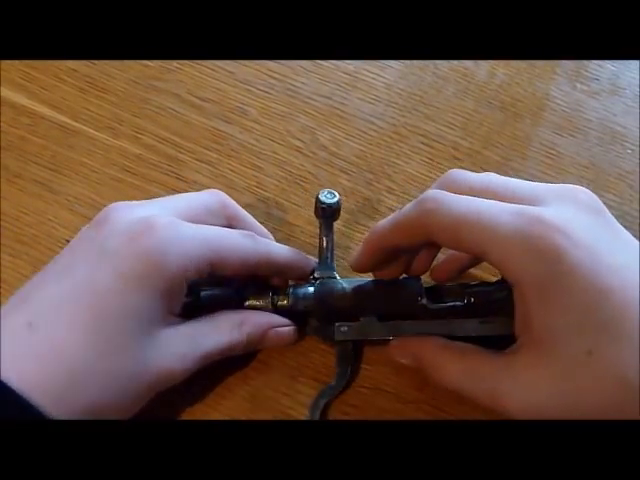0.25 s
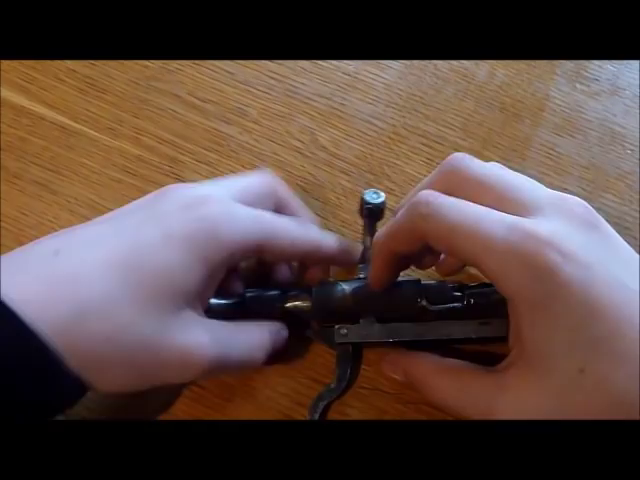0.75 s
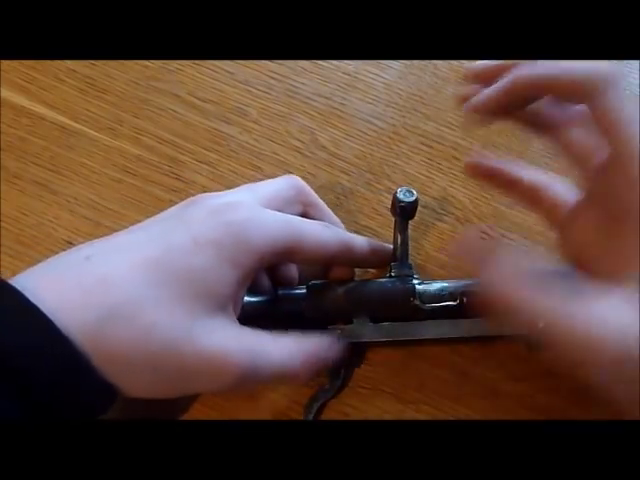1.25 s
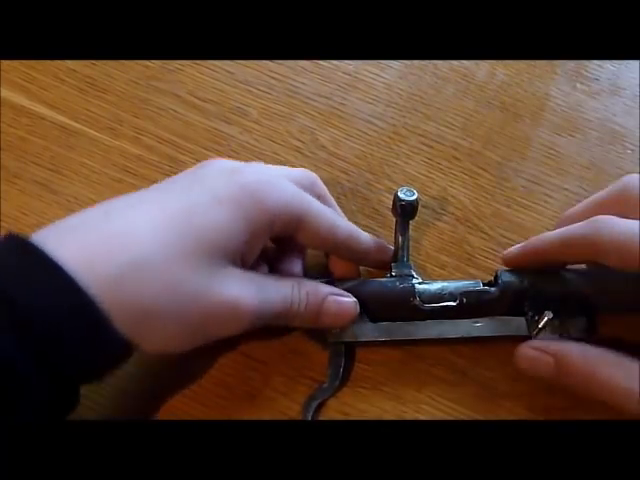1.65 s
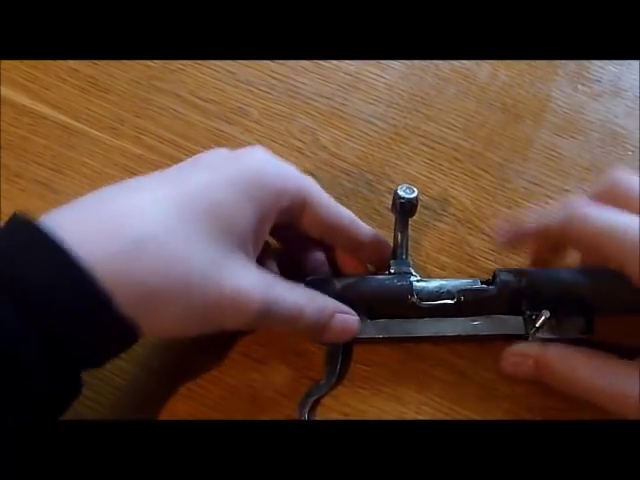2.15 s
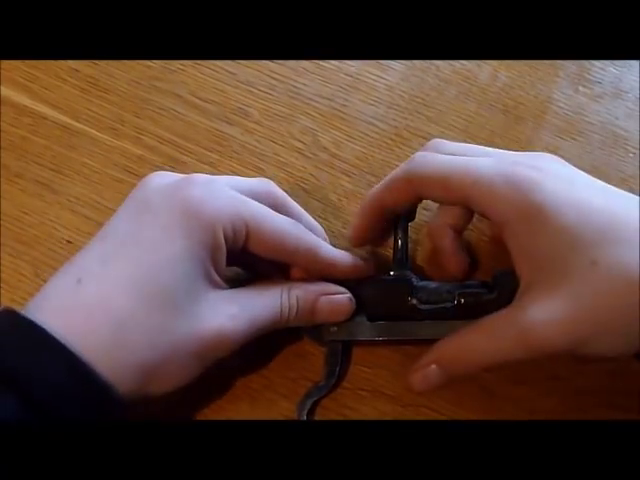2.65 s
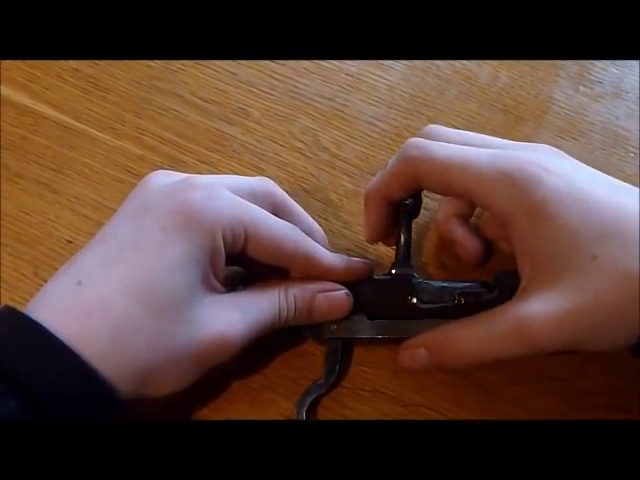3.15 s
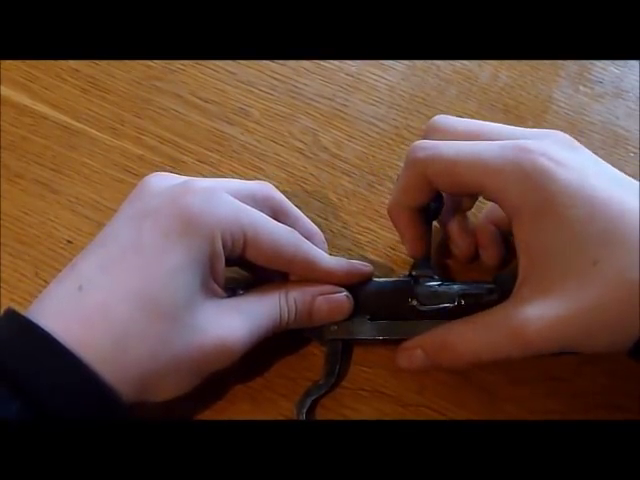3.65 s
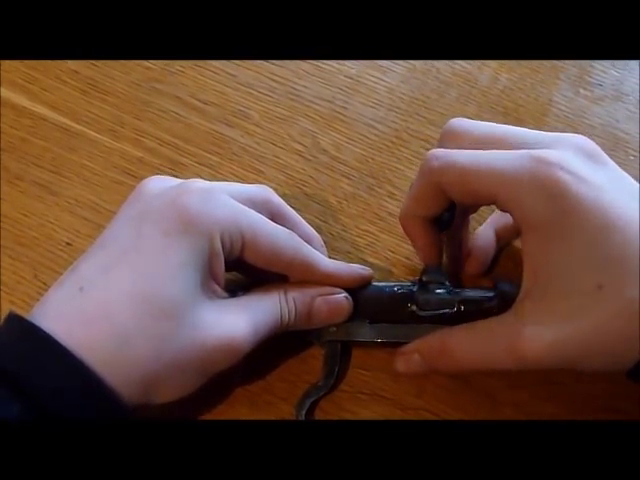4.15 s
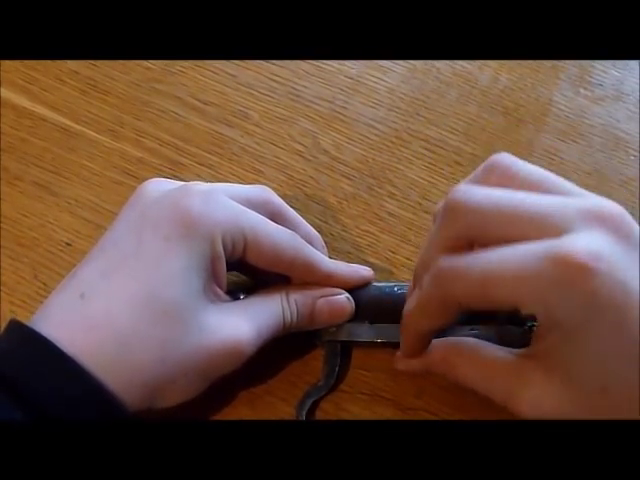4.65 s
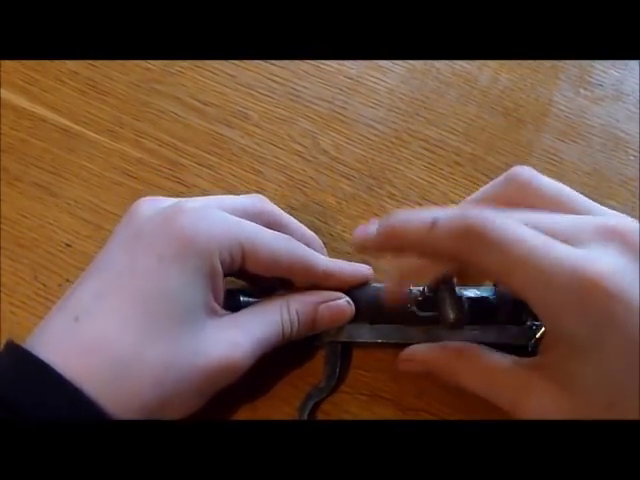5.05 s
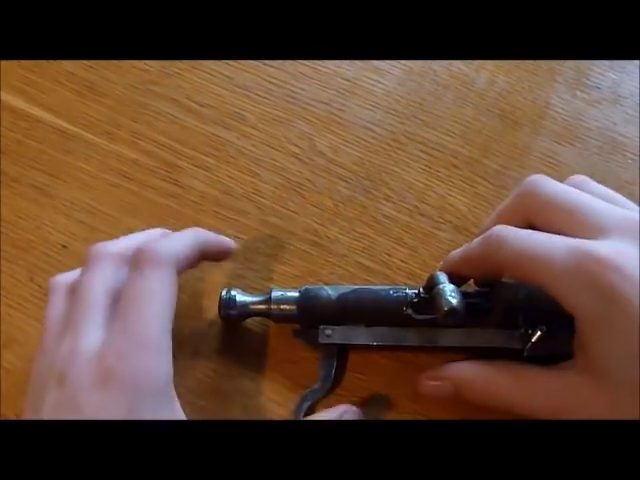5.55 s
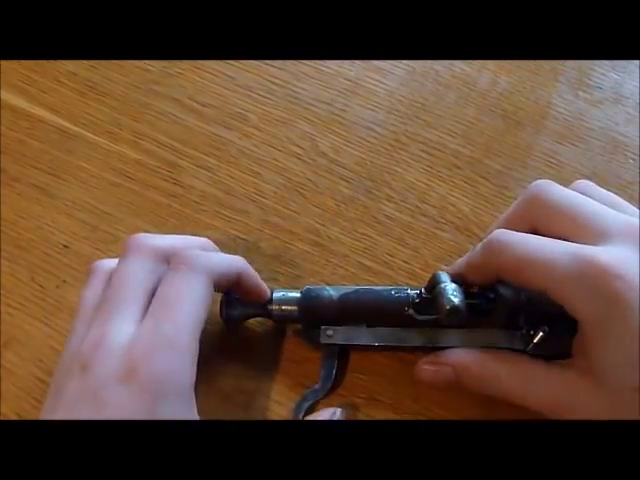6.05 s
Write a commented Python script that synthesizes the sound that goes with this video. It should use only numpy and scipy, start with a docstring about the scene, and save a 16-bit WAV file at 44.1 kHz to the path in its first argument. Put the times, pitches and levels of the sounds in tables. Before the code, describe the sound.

Steel parts of a rifle bolt action click and scrape as it is handled, knocking and dragging on a wooden table.

```python
"""At a wooden table in a small room, a steel bolt action is pushed about and worked close to a camera.
Knocks and drags set the table top booming, and leaning hands rock the table on its legs.
Steel parts click and scrape on each other, ringing their modes; the walls answer with a short tail.
Under it all lie room tone and camera hiss; the camera cuts the top end and adds a steady offset."""
import sys
import numpy as np
from scipy import signal
from scipy.fft import rfft, irfft, next_fast_len
from scipy.io import wavfile

SR = 44100
rng = np.random.default_rng(int(sys.argv[2]) if len(sys.argv) > 2 else 0)


def master(y):
    """Save y as 16-bit WAV."""
    cut = np.clip(np.atleast_2d(y).T, -1, 1)
    pcm = np.round(cut * 32767)  # scale
    wavfile.write(sys.argv[1], SR, pcm.astype(np.int16))


N = 277830

# knocks on the table top, damped by the hands: start_s, level_db, pitch_hz, edge_db, damping_factor
KNOCKS = [(.082, -14.5, 500, -2, 5.4), (.111, -16, 311, -21, 0.51), (.154, -17.5, 288, -20, 0.63),
          (.19, -19, 306, -6, 2.3), (.21, -22, 310, -6, 0.99), (.27, -6, 245, -8, 2.1),
          (.287, -3, 298, -19.5, 1.08), (0.451, -21.5, 435, -16, 0.59), (0.482, -18.5, 322, -20, 0.79),
          (0.507, -13.5, 265, -12, 0.86), (.546, -9.5, 360, -16, 0.64), (.578, -4, 321, -21.5, 0.93),
          (0.61, -14, 247, -25, 0.61), (.697, -18.5, 235, -8.5, .92), (.72, -13, 337, -31, 0.63),
          (0.806, -24, 258, -27, 0.54), (0.829, -7, 210, -22, 0.22), (0.844, -6, 280, -15.5, 0.62),
          (0.886, -12, 280, -10, 0.47), (.928, -17.5, 318, 1, 1.6), (.988, -17.5, 404, -25, 0.76),
          (1.001, -15.5, 383, -14, 1.1), (1.079, -13, 310, -19.5, 0.88), (1.09, -10, 480, -15, 1.05),
          (1.1, -9, 450, -12.5, 0.85), (1.139, -9.5, 257, -23, 2), (1.356, -24.5, 243, -15, 0.79),
          (1.386, -14.5, 425, -27, 0.87), (1.588, -26, 318, -15.5, 0.57), (1.659, -25.5, 348, -24, .93),
          (1.767, -16.5, 257, -17.5, 2.2), (1.783, -19, 251, -24, 1.2), (2.063, -11, 283, -15, 1.34),
          (2.199, -26, 287, -16, 0.53), (2.217, -21, 246, -12, 1.1), (2.257, -12, 229, -11, 0.77),
          (2.343, -24.5, 242, -20.5, 1.3), (2.364, -6, 427, -16, 0.87), (2.378, -5, 406, -25, 1.03),
          (2.39, -3.5, 274, -22.5, 1.2), (2.41, -11.5, 268, -15, 1.01), (2.436, -20.5, 298, -9, 0.78),
          (2.604, -29, 380, -12, 1.8), (2.637, -9.5, 447, -18.5, 1.3), (2.735, -23, 322, -21, 1.1),
          (2.924, -25.5, 321, -11.5, 1.8), (2.955, -26, 398, -11, 0.89), (2.986, -17.5, 420, -22, 2.3),
          (2.994, -6, 396, -6, 1.1), (3.021, -6, 378, -23, .7), (3.146, -21, 336, -3, 2.2),
          (3.286, -9.5, 320, -9.5, 0.98), (3.324, -15.5, 368, -6, .6), (3.405, -32, 270, -2, .82),
          (3.447, -15, 377, -13.5, 0.89), (3.457, -19, 460, -11, 0.71), (3.522, -20.5, 392, -2.5, 2.2),
          (3.546, -25, 258, 1.5, 2.5), (3.563, -17.5, 420, -17, 0.87), (3.621, -9.5, 450, -11.5, .69),
          (3.636, -13, 456, -13.5, 3.6), (3.717, -30, 250, -19, 1.2), (3.756, -28, 603, -0.5, 1.1),
          (3.768, -17, 372, -12, 2.6), (3.798, -23.5, 332, -11, 2.6), (3.839, -11.5, 490, -18.5, 0.6),
          (3.878, -29, 430, -20, 0.54), (3.919, -24.5, 389, -3, 0.86), (3.957, -18, 390, -10.5, 1.17),
          (4.154, -12.5, 320, -13, 1.6), (4.167, -23, 294, -11, 2.1), (4.283, -13.5, 400, -20.5, 0.75),
          (4.383, -16, 389, -21, 0.62), (4.411, -9.5, 316, -24, 0.75), (4.491, -8, 252, -28, 1.35),
          (4.514, -4.5, 445, -10.5, 0.84), (4.567, -11, 362, -16, 0.62), (4.64, -29, 262, -14, 2.6),
          (4.673, -4.5, 352, -17.5, 1.23), (4.689, -15.5, 287, -12, 7.1), (4.989, -24.5, 333, -7, 0.64),
          (5.121, -20.5, 300, -23, 1.7), (5.158, 2.5, 446, -14.5, 2), (5.175, -12.5, 426, -23, 2.2),
          (5.236, -17, 220, -25, 0.73), (5.283, -22, 218, -22, 0.58), (5.577, -29.5, 686, -11, .86),
          (5.591, -17.5, 704, -14, 1), (5.612, -11, 690, -5.5, 0.91), (5.635, -44, 600, -10, 0.84),
          (5.67, -19.5, 543, -29, 0.79), (5.703, -36, 685, -18, 0.66), (5.854, -32, 228, -24, 1.6),
          (6.064, -30, 246, -22, 1.3)]
# steel clicks: start_s, level_db, brightest_hz, chatter_t60_s
CLICKS = [(0.0811, -18, 2980, 0.013), (0.0866, -29.5, 6500, 0.022), (.213, -35, 3000, 0.01),
          (0.2685, -22, 3060, 0.0057), (0.2971, -16.5, 4030, 0.0078), (.692, -36.5, 4040, 0.017),
          (0.729, -32, 4000, 0.0049), (.843, -32.5, 3000, .009), (.879, -37, 3020, .015),
          (0.9243, -33.5, 3050, 0.0084), (1.0945, -32, 3210, .038), (2.0604, -44, 3740, .007),
          (2.227, -36.5, 3020, 0.014), (2.255, -34.5, 2900, 0.028), (2.368, -24.5, 4400, .022),
          (2.4917, -41, 3660, 0.025), (2.6363, -42, 2880, 0.038), (2.991, -32.5, 4750, 0.022),
          (3.0192, -39, 3270, 0.017), (3.1457, -31.5, 3620, 0.01), (3.2878, -33, 3760, 0.017),
          (3.5192, -41.5, 3570, 0.013), (3.5373, -34.5, 5000, 0.0064), (3.7655, -35.5, 4250, 0.0093),
          (3.8018, -31.5, 4170, 0.01), (3.903, -36, 4940, 0.026), (3.9225, -37, 3710, .011),
          (3.9569, -35.5, 4740, 0.015), (4.1546, -35, 3010, .005), (4.5126, -11, 3080, 0.023),
          (4.6721, -35, 3280, .009), (4.9895, -47.5, 2950, 0.014), (5.1176, -37.5, 4870, 0.0042),
          (5.1573, -14.5, 2900, 0.0033), (5.589, -44, 3580, 0.011), (5.6061, -19, 3240, 0.023),
          (5.6113, -20.5, 3130, 0.01), (5.6257, -27.5, 3010, 0.012), (5.667, -39.5, 3320, .018)]
# the action dragging on the wood: start_s, hold_s, level_db, sway_db
DRAG_STROKES = [(0, .1, -42.5, -42), (0.118, .07, -40, -35), (0.216, 0.079, -32, -32.5),
                (0.511, 0.11, -22.5, -34.5), (0.658, 0.088, -32, -36), (0.843, 0.14, -22, -41.5),
                (1.091, 0.043, -25.5, -37), (1.384, 0.041, -37.5, -44), (1.64, 0.013, -43, -41),
                (1.732, 0.037, -40.5, -50), (1.9, 0.058, -53.5, -55), (2.054, 0.026, -42.5, -48),
                (2.258, 0.013, -27, -33.5), (2.37, .05, -23, -38.5), (2.662, 0.013, -33.5, -43),
                (2.74, 0.11, -43.5, -58), (3.006, 0.013, -24.5, -33.5), (3.16, 0.013, -41.5, -45.5),
                (3.303, 0.021, -31.5, -34.5), (3.417, .1, -34, -55), (3.557, .02, -28, -32),
                (3.767, .02, -33.5, -42), (3.844, 0.2, -38.5, -57), (4.145, 0.046, -35, -42.5),
                (4.295, .1, -37.5, -48), (4.45, .07, -38, -61), (4.606, 0.027, -27.5, -38),
                (4.85, .03, -50.5, -49), (4.987, 0.025, -49, -49), (5.14, .02, -45.5, -49),
                (5.598, 0.056, -43, -46), (5.855, 0.019, -65, -49), (6.06, .03, -49.5, -57),
                (6.19, 0.015, -46, -51), (6.29, .02, -42.5, -56)]
# steel sliding on steel: start_s, hold_s, level_db, brightest_hz
SLIDE_STROKES = [(0.288, 0.011, -37, 5680), (.475, 0.047, -61, 4900), (0.528, .08, -57.5, 4700),
                 (.84, 0.0043, -47, 4690), (0.878, 0.088, -54, 4800), (.9, .02, -61, 6200),
                 (2.365, 0.014, -48, 5390), (2.999, 0.019, -55.5, 4720), (3.296, .005, -56, 5200),
                 (3.325, 0.0064, -44.5, 5100), (3.401, 0.012, -53.5, 5130), (3.431, 0.017, -47, 5440),
                 (3.518, 0.035, -49, 5070), (3.62, 0.026, -54, 4930), (3.762, .005, -54.5, 4920),
                 (3.801, .02, -54, 4730), (3.957, 0.034, -57, 4900), (4.08, 0.054, -61, 4900),
                 (4.143, 0.011, -49.5, 5300), (4.509, 0.066, -57, 5030)]
# the boom of the table top: pitch_hz, width_hz, level_db
TOP_MODES = [(108, 6.7, -13.5), (153, 16, -17), (216, 28, 4.5), (267, 15, -3.5), (295.4, 12, -8.5),
             (361.6, 44.3, -2), (397, 74, -6), (460.5, 45, -0.5), (508, 34, -5.5), (632, 45, -8),
             (668, 14, -24.5), (856, 69, -14.5), (852.6, 59, -9), (981, 59, -16)]
# the edge of a hard contact on wood: pitch_hz, width_hz, level_db
EDGE_MODES = [(766, 450, 2.5), (920, 250, 11), (1155, 238, 6.5), (1537, 260, 1.5), (1816, 560, -4.5),
              (2120, 1100, -8)]
# the ring of the steel parts: pitch_hz, width_hz, level_db
STEEL_MODES = [(1930, 360, 8.5), (2247, 56, -7), (2780, 69, -0.5), (3070, 200, 5), (3616, 120, 3),
               (4015, 110, 1.5), (4420, 83, -0.5), (4814, 140, -1.5), (4950, 190, -12), (5245, 140, -1.5),
               (6040, 500, -10), (6100, 80, -2), (6350, 170, -3), (7600, 400, -22)]
# the table rocking on its legs, as a filter applied twice: pitch_hz, width_hz, level_db
SWAY_MODES = [(77.4, 9, 0), (108.4, 30, 3.5)]
# the room's tail: frequency_hz, t60_s
ROOM_DECAY = [(100, 1), (260, 0.41), (700, 0.37), (1800, 0.49), (4800, 0.32), (8000, 0.11)]
# the colour of room tone and camera hiss: frequency_hz, relative_level_db
HISS_SPECTRUM = [(15, -35.5), (40, -5.5), (70, -9), (130, -8.5), (215, -1.5), (320, -6.5), (700, -13),
                 (1400, -19), (3300, -26.5), (6400, -28.5), (7900, -31), (9000, -58)]

KNOCK_SEND_DB, CLICK_SEND_DB, DRAG_SEND_DB, SLIDE_SEND_DB = -4.5, -8.5, -8.5, -12.5  # into the room
DRY_FROM_S, DRIER_DB = 5.5, -9  # the last touches ring dry, with little room tail
RASP_DB, HISS_DB = -18.5, -48
BAND_LIMIT_HZ, DC_OFFSET = 8120, .0289


def knocks():
    """Each knock rings the table top around its own pitch; hard contacts add an edge. Gives dry, send."""
    out, t = np.zeros((2, N + SR)), np.arange(SR // 5) / SR
    for start_s, level_db, hz, edge_db, damping in KNOCKS:
        # a short push and its slower rebound: little net force, so little boom far below the thud
        push = np.pad(np.hanning(int(0.4 / hz * SR) + 3), (0, SR // 100))
        push = signal.lfilter(*signal.butter(1, 0.28 * hz, "high", fs=SR), push)
        # a lightly damped knock swells and lets few modes ring long; a smothered one is short and broad
        thud = ring(TOP_MODES, lambda f: near(f, hz, octaves=.45 * damping), damping, push, t)
        thud *= 1 - np.exp(-t * damping ** 2 / 0.00073)
        # the steel settles in a few ms of rattle, brighter the harder the blow
        rattle = rng.standard_normal(SR // 50) * amp(-60 * t[:SR // 50] / 0.02)
        rattle = np.convolve(rattle, np.hanning(int(0.00025 * SR) + 3))
        edge = ring(EDGE_MODES, lambda f: (f / 1100) ** (0.13 + level_db / 25), 0.7, rattle, t)
        knock = rng.choice([-1, 1]) * amp(level_db) * (thud + amp(edge_db) * edge)
        send_db = KNOCK_SEND_DB + DRIER_DB * (start_s > DRY_FROM_S)
        out[:, round(start_s * SR):][:, :len(t)] += [knock, amp(send_db) * knock]
    return out[:, :N]


def clicks():
    """A brief chatter of steel on steel rings the parts. Gives dry, send."""
    out, t = np.zeros((2, N + SR)), np.arange(SR // 10) / SR
    for start_s, level_db, hz, t60_s in CLICKS:
        chatter = rng.standard_normal(len(t) // 2) * amp(-60 * t[:len(t) // 2] / t60_s)
        weight = lambda f: 0.21 / (1 + (f / 6600) ** 8) + near(f, hz, octaves=0.054)
        ping = ring(STEEL_MODES, weight, 1.3, chatter, t)
        # the thin ringing stays near; the walls get the broad snap
        snap = ring(STEEL_MODES, lambda f: weight(f) / (1 + (f / 4000) ** 4), 4.5, chatter[:SR // 1000], t)
        # a longer chatter feeds the room more
        send_db = CLICK_SEND_DB + 10 * np.log10(t60_s / 0.013) + DRIER_DB * (start_s > DRY_FROM_S)
        out[:, round(start_s * SR):][:, :len(t)] += amp(level_db) * np.array([ping, amp(send_db) * snap])
    return out[:, :N]


def drag():
    """Dense catches under the action drive the table top; leaning hands rock it. Gives scrape, sway."""
    start_s, hold_s, level_db, sway_db = np.transpose(DRAG_STROKES)
    rub = strokes(start_s, hold_s, level_db, rise_db_s=400, fall_db_s=231).max(axis=0)
    lean = strokes(start_s, hold_s, sway_db, rise_db_s=355, fall_db_s=182).max(axis=0)
    boom = unit(filtered(grit(per_s=300, spread_db=4), body(TOP_MODES)))
    rasp = unit(filtered(grit(per_s=1200, spread_db=0), body(EDGE_MODES)))
    sway = unit(filtered(rng.standard_normal(N), lambda f: body(SWAY_MODES)(f) ** 2))
    return rub * (boom + amp(RASP_DB) * rasp), lean * sway


def slide():
    """Grit between steel faces sings near one pitch; lower modes answer faintly, higher ones hardly."""
    start_s, hold_s, level_db, bright_hz = np.transpose(SLIDE_STROKES)
    catches = grit(per_s=650, spread_db=4)
    smear = 2.3  # pressed together, the parts ring broader
    voices = np.array([amp(db) * unit(filtered(catches, lambda f: body([(hz, smear * width, db)])(f) ** 2))
                       for hz, width, db in STEEL_MODES])
    mode_hz = np.transpose(STEEL_MODES)[0]
    # a long slow stroke wakes the lower modes more
    lower = (0.26 + 2 * hold_s[:, None]) / (1 + (mode_hz / bright_hz[:, None]) ** 12)
    weights = lower + near(mode_hz, bright_hz[:, None], octaves=0.071)
    envelopes = strokes(start_s, hold_s, level_db, rise_db_s=1407.5, fall_db_s=460)
    return np.sum(envelopes * (weights @ voices), axis=0)


def room(send, new_path_s=.3, gap_samples=350):
    """The walls answer, each frequency dying at its own speed; the echo path changes as hands move."""
    out, step = np.zeros(N + 2 * SR), int(new_path_s * SR)
    for start in range(0, N, step):
        hz, t, noise = signal.stft(rng.standard_normal(SR // 2), SR, nperseg=512)
        build_up = 1 - np.exp(-(t + 0.025) / 0.0054)
        decay = amp(-60 * t / along(ROOM_DECAY, hz)[:, None])
        low_cut = (hz / (hz + 150))[:, None]  # light walls let the bass escape
        tail = signal.istft(noise * build_up * decay * low_cut, SR, nperseg=512)[1]
        wet = signal.fftconvolve(send[start:start + step], tail / np.linalg.norm(tail))
        out[start + gap_samples:][:len(wet)] += wet
    return out[:N]


def hiss():
    """A steady bed of room tone and camera noise."""
    return amp(HISS_DB) * unit(filtered(rng.standard_normal(N), lambda hz: amp(along(HISS_SPECTRUM, hz))))


def ring(modes, weight, damping, push, t):
    """One push rings the modes at scattered strengths, peak 1; the wider a mode, the sooner it dies."""
    hz, width, db = np.transpose(modes)[..., None]
    scatter_db = rng.normal(0, 2.2, hz.shape)
    size = amp(db + scatter_db) * weight(hz) * np.sqrt(width)
    partials = size * np.exp(-np.pi * width * damping * t) * np.sin(2 * np.pi * hz * t)
    hit = np.convolve(partials.sum(axis=0), push)[:len(t)]
    return hit / np.abs(hit).max()


def grit(per_s, spread_db):
    """Tiny irregular catches of a rubbed surface, rms 1."""
    size = amp(spread_db * rng.standard_normal(N)) * rng.choice([-1, 1], size=N)
    return unit(size * (rng.random(N) < per_s / SR))


def strokes(start_s, hold_s, level_db, rise_db_s, fall_db_s):
    """One envelope a stroke: swell up to its start, hold, fade."""
    t = np.arange(N) / SR - start_s[:, None]
    below_db = rise_db_s * np.maximum(-t, 0) + fall_db_s * np.maximum(t - hold_s[:, None], 0)
    return amp(level_db[:, None] - below_db)


def body(modes):
    """Frequency response of a bank of resonators with alternating polarity."""
    return lambda f: sum((-1) ** k * amp(db) * 1j * f * width / (hz * hz - f * f + 1j * f * width)
                         for k, (hz, width, db) in enumerate(modes))


def near(hz, centre_hz, octaves):
    """Bell-shaped emphasis around a pitch."""
    return np.exp(-.5 * (np.log2(hz / centre_hz) / octaves) ** 2)


def filtered(x, response):
    """x through a complex frequency response."""
    size = next_fast_len(N + SR // 2)
    return irfft(rfft(x, size) * response(np.fft.rfftfreq(size, 1 / SR)), size)[..., :N]


def along(points, hz):
    """A breakpoint curve read on a log frequency axis."""
    point_hz, values = np.transpose(points)
    return np.interp(np.log(hz + 1), np.log(point_hz + 1), values)


def amp(db):
    """dB to gain."""
    return 10 ** (np.asarray(db) / 20)


def unit(x):
    """Scaled to rms 1."""
    return x / np.sqrt(np.mean(x ** 2) + 1e-20)


def scene():
    """Wood and steel, dry and through the room, over the table's sway and the hiss."""
    hits, hit_send = knocks() + clicks()
    wood, sway = drag()
    steel = slide()
    reverb = room(hit_send + amp(DRAG_SEND_DB) * wood + amp(SLIDE_SEND_DB) * steel)
    # the small microphone hears little of the lowest air motion
    mix = filtered(hits + wood + steel + reverb, lambda hz: (1j * hz / (85 + 1j * hz)) ** 4)
    return (mix + sway + hiss())[None]


def record(dry):
    """The camera's treble rolls off into a hard band limit; its converter sits slightly off zero."""
    return filtered(dry, lambda hz: (hz < BAND_LIMIT_HZ) / np.sqrt(1 + (hz / 7500) ** 24)) + DC_OFFSET


dry = scene()
out = record(dry)
master(out)
```